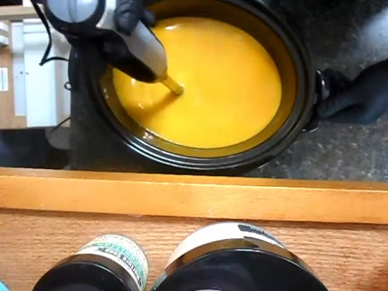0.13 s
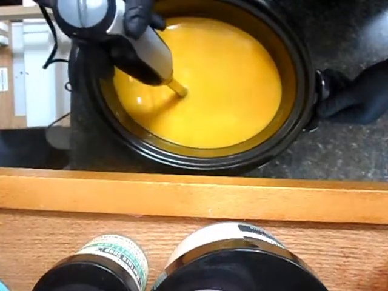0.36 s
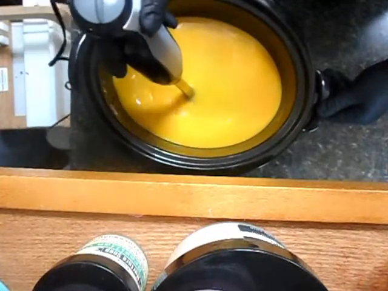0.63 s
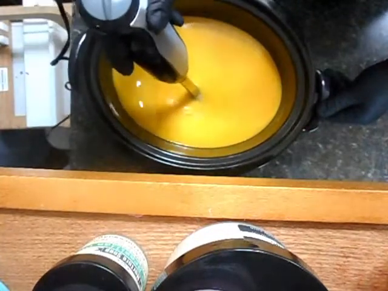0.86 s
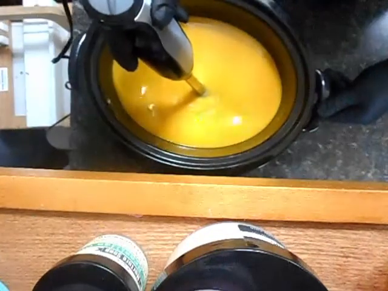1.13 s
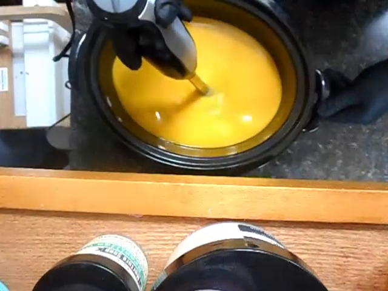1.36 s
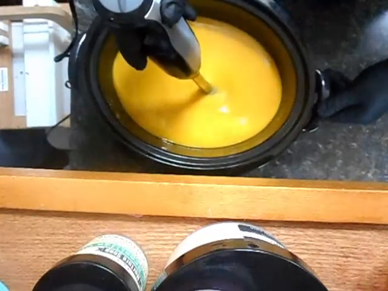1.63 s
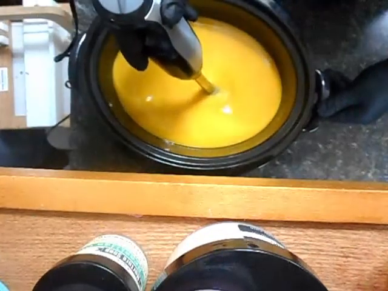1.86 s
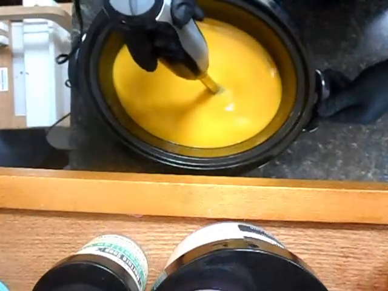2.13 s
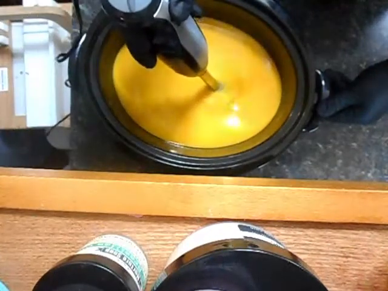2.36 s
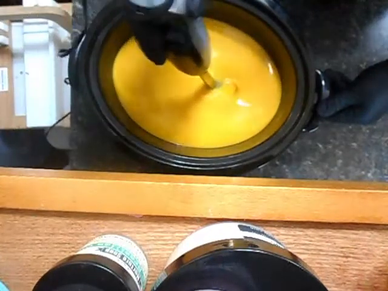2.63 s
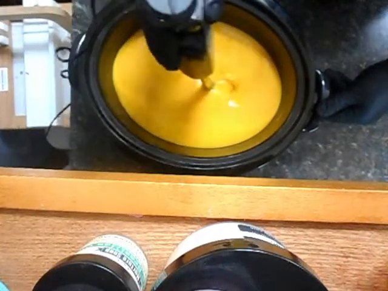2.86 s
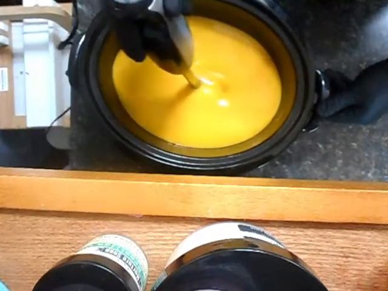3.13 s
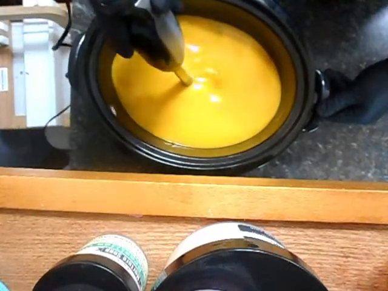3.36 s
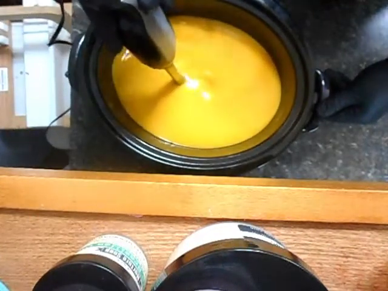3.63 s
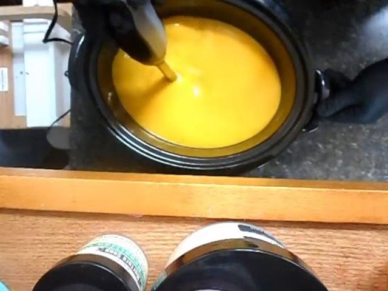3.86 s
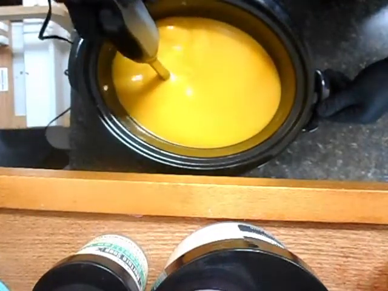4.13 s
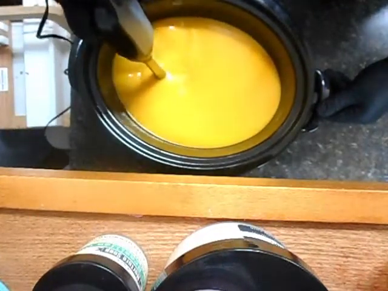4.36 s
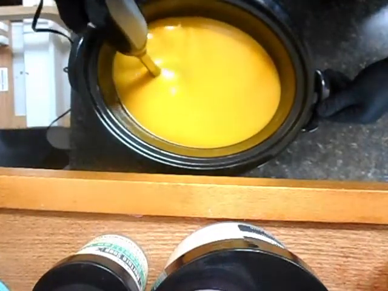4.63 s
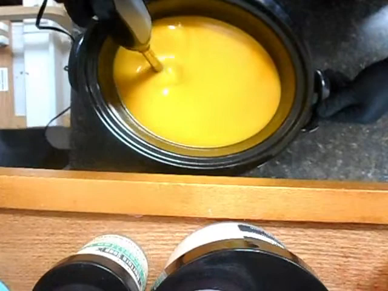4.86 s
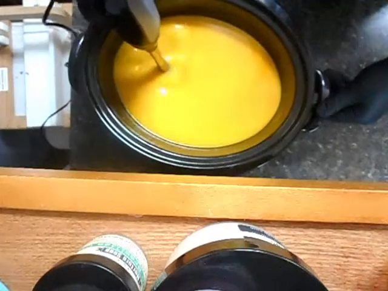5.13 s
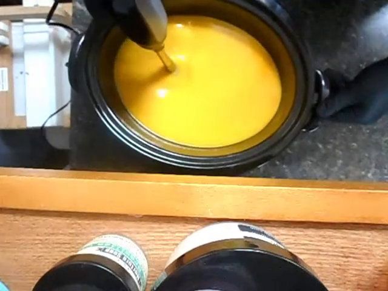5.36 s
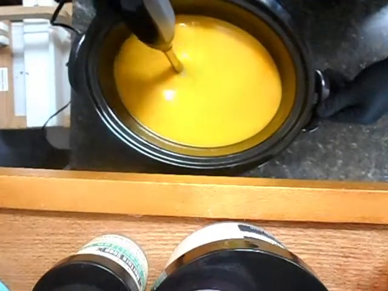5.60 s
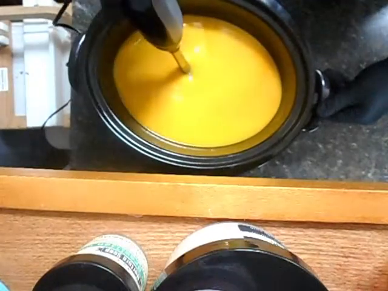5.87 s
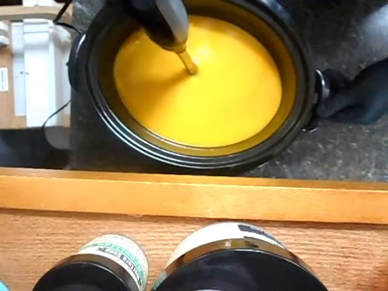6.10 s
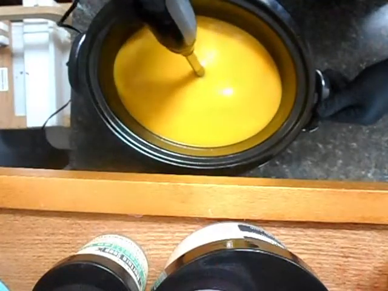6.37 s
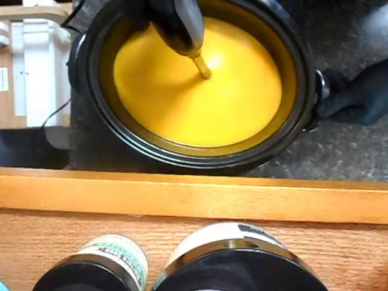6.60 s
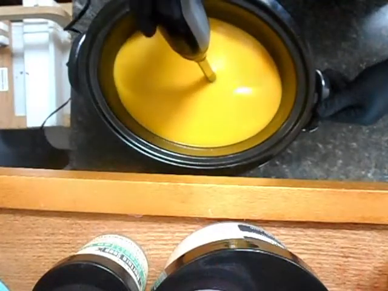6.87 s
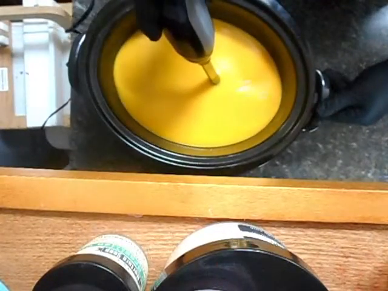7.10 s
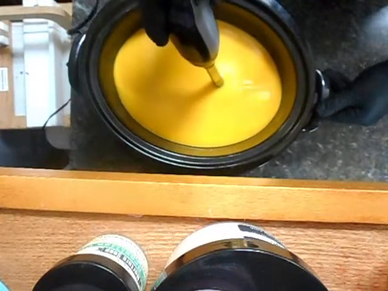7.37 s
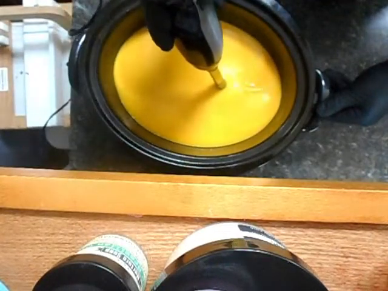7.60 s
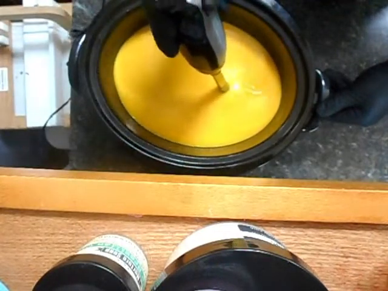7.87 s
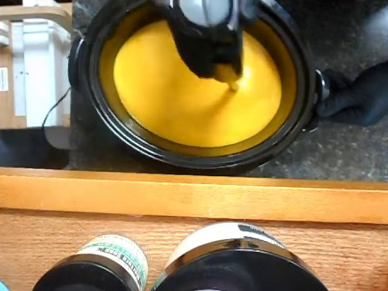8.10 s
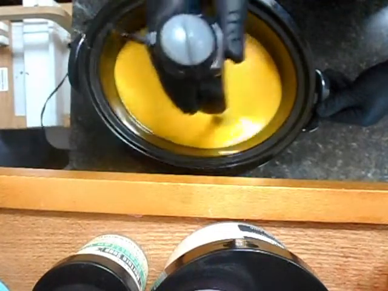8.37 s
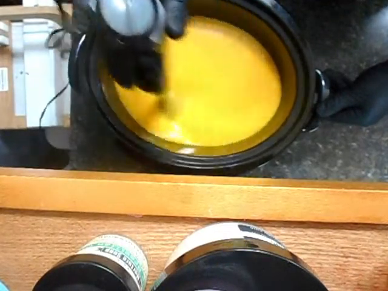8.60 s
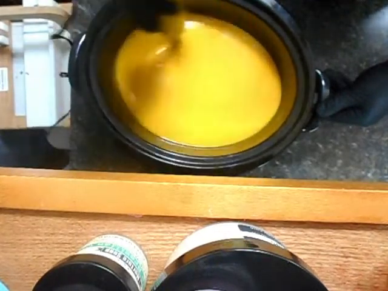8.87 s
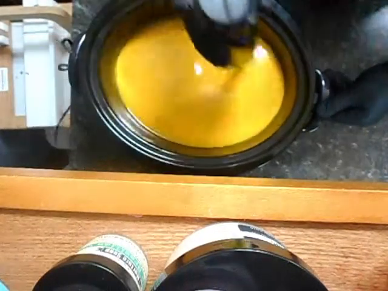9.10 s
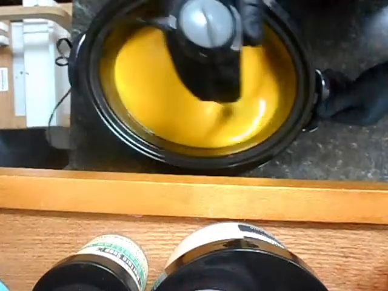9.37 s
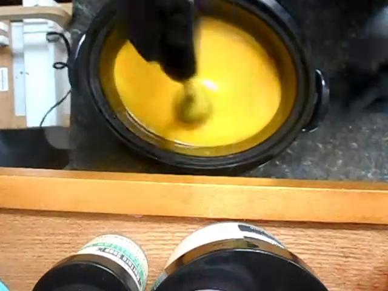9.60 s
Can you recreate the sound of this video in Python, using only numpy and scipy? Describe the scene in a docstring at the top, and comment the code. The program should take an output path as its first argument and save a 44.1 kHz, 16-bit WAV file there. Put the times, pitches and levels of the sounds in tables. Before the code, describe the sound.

A steady, harsh blender whir fills most of the scene, close and single-channel, with slightly gritty, artificial treble. The pitch barely wavers while individual tones come and go. It cuts off near the end with a short low gulp and a falling whine. Several dull ceramic knocks follow, one sharp and strong, then soft dragging through batter and small crackly glove creases, in a lightly reverberant kitchen.

```python
"""In a kitchen, a handheld stick blender whirs in thick batter in a stoneware pot, close below a small camera.
Tones locked to the shaft stand over noises for rasp and churn, which ring the housing.
The motor is let go and coasts down with a gurgle; the foot then knocks and drags on the pot as it stirs,
the shaft tube whines and gloves rustle. Resonances shape the knocks, and the room answers them.
The camera samples at half rate and fills the gaps with straight lines, which mirrors the treble."""
import sys
import numpy as np
from scipy import signal
from scipy.fft import rfft, irfft, next_fast_len
from scipy.io import wavfile
from scipy.ndimage import uniform_filter1d, map_coordinates

SR = 44100
rng = np.random.default_rng(int(sys.argv[2]) if len(sys.argv) > 2 else 0)


def gain_from_decibels(decibels):
    """Convert decibel values to linear amplitude factors."""
    exponent = np.asarray(decibels, float) / 20
    return 10 ** exponent


def transcribe(u):
    """Save the signal u as a 16-bit wav file named by the first command-line argument.

    u: samples, shape (n,) or (channels, n), limited to [-1, 1]; the rate is SR.
    q: integer samples, one column per channel.
    """
    v = np.clip(np.atleast_2d(u).T, -1, 1)
    q = np.round(v * 32767).astype(np.int16)
    wavfile.write(sys.argv[1], SR, q)


N = 429093
TIME_S = np.arange(N) / SR
RELEASE_S, STALL_S = 7.91, 8.17  # the switch opens; the blades stall


def unit(x):
    """Scaled to rms 1."""
    return x / np.sqrt(np.mean(x ** 2) + 1e-20)


def along(points, hz):
    """(frequency [Hz], value) points read on a log frequency axis."""
    f, v = np.transpose(points)
    return np.interp(np.log(hz + 1), np.log(f + 1), v)


def curves(rows):
    """One value per sample for each column after the time."""
    s, *columns = np.transpose(rows)
    return [np.interp(TIME_S, s, column) for column in columns]


def wobble(rate):
    """A smooth random curve, rate knots a second."""
    knots = rng.standard_normal(int(N * rate / SR) + 4)
    return map_coordinates(knots, [np.arange(N) * rate / SR])


def filtered(x, response):
    """x times a response given as a function of frequency."""
    m = next_fast_len(N + SR // 2)
    return irfft(rfft(x, m) * response(np.fft.rfftfreq(m, 1 / SR)), m)[..., :N]


def resonances(modes):
    """Causal response of (frequency [Hz], width [Hz], level [dB]) resonances, with alternating signs."""
    def response(f):
        total = 0
        for k, (centre, width, db) in enumerate(modes):
            ring = 1j * f * width / (centre * centre - f * f + 1j * f * width)
            total = total + (-1) ** k * gain_from_decibels(db) * ring
        return total
    return response


def patchy(patchy_db, slow_db):
    """White noise with random patches of gain: short ones, and long narrow ones
    as the source moves among reflections."""
    z = signal.stft(rng.standard_normal(N), nperseg=512)[2]
    short = uniform_filter1d(uniform_filter1d(rng.standard_normal(z.shape), 6, 0), 8, 1)
    long = uniform_filter1d(uniform_filter1d(rng.standard_normal(z.shape), 2, 0), 120, 1)
    gain = gain_from_decibels(patchy_db * unit(short) + slow_db * unit(long))
    return signal.istft(z * gain, nperseg=512)[1][:N]


def coloured(x, spectrum):
    """x through a (frequency [Hz], level [dB]) spectrum, rms 1."""
    return unit(filtered(x, lambda hz: gain_from_decibels(along(spectrum, hz))))


def fade(start_s, db_per_s):
    """1 until start, then a steady fall; a negative slope instead rises to reach 1 at start."""
    return gain_from_decibels(np.minimum(0, -db_per_s * (TIME_S - start_s)))


# narrow resonances of housing, shaft tube and pot that the noise sets ringing:
# (frequency [Hz], width [Hz], level over the noise [dB])
HOUSING_MODES = [(369, 18, 11.5), (406.4, 18, 13), (599, 13, 6), (1349, 15, 7), (1470, 13.3, 5.5),
                 (1750, 250, 3.5), (2300, 103, 4.5), (4460, 160, 1.5), (6660, 510, -2)]


def blender():
    """Shaft tones, over rasp and churn that share one uneven load and set the housing ringing."""
    turn = shaft_angle()
    lead_db, hum_db, swing_db = tone_levels()
    load = wobble(15)  # blades biting unevenly
    noise = rasp(turn, load) + churn(turn, load, order_6_swing_db=swing_db[2])
    noise = noise * fade(STALL_S, db_per_s=190)
    ringing = filtered(noise, lambda f: np.hypot(1, abs(resonances(HOUSING_MODES)(f))))
    return motor_tones(turn, lead_db, hum_db, swing_db) + ringing


# motor speed under load, before the coast: (time [s], turns per second [Hz])
SHAFT_SPEED = [(0.3, 218.6), (1.6, 217.3), (2.5, 217.6), (2.8, 218.5), (4.6, 218.6), (5.3, 219.2),
               (5.8, 218.8), (6.15, 217.5), (7.6, 216.3), (7.85, 216.7)]


def shaft_angle():
    """Angle of the shaft in radians; its speed sinks once the power is off."""
    hz, = curves(SHAFT_SPEED)
    return 2 * np.pi * np.cumsum(hz * fade(RELEASE_S, db_per_s=22)) / SR


# three leading shaft orders swell and sink as the blender is moved about:
# (time [s], order 3 [dB rms], order 4 [dB rms], order 6 [dB rms])
LEAD_ORDERS = [(0.13, -34, -35, -40), (0.42, -29, -32, -34), (0.77, -24, -34, -39), (1.5, -36, -31, -42),
               (1.96, -29, -38, -35), (2.27, -26, -41, -43), (2.78, -23, -37, -34), (3.19, -21, -32, -37),
               (3.86, -27, -31, -34), (4.2, -31, -30, -31), (4.57, -25, -34, -31), (5.0, -35, -35, -29),
               (5.38, -33, -40, -28), (5.91, -21, -41, -32), (6.51, -21, -36, -34), (7.04, -22, -33, -44),
               (7.23, -25, -33, -44), (7.85, -23, -36, -38)]
# mains hum while the motor runs: (time [s], level [dB rms])
HUM_LEVEL = [(0.3, -79), (1.1, -66), (3.0, -67), (4.6, -85), (5.4, -75), (7.4, -66), (7.85, -71)]


def tone_levels():
    """Levels of the lead orders and the hum, and how far all four swing about their usual levels."""
    lead_db = np.array(curves(LEAD_ORDERS))
    hum_db, = curves(HUM_LEVEL)
    lead_swing_db = lead_db - np.mean(LEAD_ORDERS, axis=0)[1:, None]
    hum_swing_db = hum_db - np.mean(HUM_LEVEL, axis=0)[1]
    return lead_db, hum_db, np.vstack([lead_swing_db, hum_swing_db])


# other orders that follow the lead orders and the hum:
# (multiple of the shaft speed, usual level [dB rms], then gain per dB of orders 3, 4, 6 and the hum [dB/dB])
FOLLOWING_ORDERS = [(1, -51, -.1, -.22, -.15, .14), (2, -41, -.2, -.24, .4, -.1),
                    (5, -43.5, .2, .3, .35, -.42), (7, -33, -.62, -.23, -.35, 0)]
# higher orders: (multiple of the shaft speed, level [dB rms])
UPPER_ORDERS = [(8, -38.5), (9, -45), (10, -42), (11, -46)]
# the mains ripple beats with the shaft:
# (multiple of the shaft speed, ripple steps added, usual level [dB rms])
RIPPLE_BEATS = [(1, -1, -73), (1, 1, -62), (3, -1, -50), (3, 1, -45)]


def motor_tones(turn, lead_db, hum_db, swing_db):
    """Sines at multiples of the shaft speed, their beats with the motor's torque ripple, and mains hum."""
    ripple_hz, beats_follow = 120, 0.4  # the beats follow the hum [dB/dB]
    ripple = 2 * np.pi * ripple_hz * TIME_S
    orders = list(zip((3, 4, 6), lead_db))
    orders += [(k, db + np.dot(per_db, swing_db)) for k, db, *per_db in FOLLOWING_ORDERS]
    orders += UPPER_ORDERS
    tones = np.zeros(N)
    for k, db in orders:
        phase = 0.065 * wobble(30) + rng.uniform(0, 2 * np.pi)
        tones += gain_from_decibels(db + 1.0 * wobble(25)) * np.sin(k * turn + phase)
    for k, step, db in RIPPLE_BEATS:
        beat_db = db + beats_follow * swing_db[-1] + 2.7 * wobble(1.23)
        tones += gain_from_decibels(beat_db) * np.sin(k * turn + step * ripple)
    tones *= fade(RELEASE_S, db_per_s=330)  # they die with the magnetic pull
    hum = gain_from_decibels(hum_db) * np.sin(ripple) * fade(RELEASE_S, db_per_s=200)
    return np.sqrt(2) * (tones + hum)  # sine peaks from rms levels


# rasp of gears, brushes and fan: (frequency [Hz], relative level per Hz [dB])
RASP_SPECTRUM = [(700, -41.5), (1000, -13), (1150, -4), (1300, 0.5), (1800, -1), (2350, -0.5), (2420, 0),
                 (2800, 4), (3100, 1.5), (3700, -2.5), (5000, -9.5), (7000, -11), (8000, -15), (10000, -33)]
# rasp while the motor runs: (time [s], level [dB])
RASP_LEVEL = [(0, -20.5), (0.9, -23), (1.45, -21), (1.9, -21.5), (2.4, -21.5), (2.75, -22.5), (3.3, -23.5),
              (3.6, -21), (3.9, -22), (4.3, -21), (5.1, -21), (5.7, -22), (6.5, -24.4), (7.1, -22),
              (7.5, -21), (7.9, -22)]
# the strongest housing resonance, heard when the vents face the camera:
# (frequency [Hz], width [Hz], level [dB])
VENT_MODE = [(3486, 200, 0)]
# that ring over the rasp: (time [s], level [dB])
VENT_LEVEL = [(0, -4.5), (1.8, -3), (2.45, -7), (2.75, -13), (3.3, -16), (3.8, -7.5), (6.3, -5.5),
              (7.9, -11.5)]


def rasp(turn, load):
    """Noise of gears, brushes and fan that flutters with each turn, plus a ring through the vents."""
    flutter_db = 0.3 * load + 0.78 * wobble(120) + 1.0 * wobble(1500)
    turn_db = 0.36 * np.sin(turn) + 0.3 * np.sin(2 * turn) + 0.25 * np.sin(3 * turn)
    teeth = gain_from_decibels(flutter_db + turn_db)
    (rasp_db,), (vent_db,) = curves(RASP_LEVEL), curves(VENT_LEVEL)
    hiss = coloured(teeth * patchy(0.82, 2.0), RASP_SPECTRUM)
    vents = unit(filtered(teeth * patchy(0.82, 1.8), resonances(VENT_MODE)))
    return gain_from_decibels(rasp_db) * (hiss + gain_from_decibels(vent_db) * vents) * fade(RELEASE_S, db_per_s=46)


# batter churning in the pot: (frequency [Hz], relative level per Hz [dB])
CHURN_SPECTRUM = [(30, -58), (70, -44), (160, -32.5), (300, -28), (400, -21), (550, -9), (700, 4),
                  (800, -1.5), (1000, -6), (1400, -39)]


def churn(turn, load, order_6_swing_db):
    """Low noise of batter, pulsing with each turn; it grows a little with order 6."""
    usual_db, follow, surge_db, surge_s = -29.5, 0.063, 4.5, 0.07  # follow [dB/dB]
    surge = surge_db * np.clip((TIME_S - RELEASE_S) / surge_s, 0, 1)  # just after the release
    pulse = gain_from_decibels(0.95 * load + 0.96 * wobble(40) + 1.1 * np.sin(turn))
    batter = coloured(pulse * patchy(1.34, 1.13), CHURN_SPECTRUM)
    gain = gain_from_decibels(usual_db + follow * order_6_swing_db + surge)
    return gain * batter * fade(RELEASE_S + surge_s, db_per_s=66)


def gurgle():
    """As the blades slow the vortex collapses in uneven low gulps: noise through a steep resonance."""
    gulps = gain_from_decibels(2.5 * wobble(28)) * rng.standard_normal(N)
    low = unit(filtered(gulps, lambda f: resonances([(560, 330, 0)])(f) ** 3))
    return gain_from_decibels(-30) * low * fade(7.93, db_per_s=-450) * fade(8.06, db_per_s=167)


# blows of the foot on the pot: (time [s], blow level [dB], thud level over the blow [dB],
# t60 [s], the spot struck favours modes near [Hz])
POT_KNOCKS = [(8.1192, -18, -19, 0.024, 3400), (8.2462, -30, -28.5, 0.02, 3200),
              (8.3, -34, -30, 0.02, 4200), (8.3994, -35, -30, 0.025, 3180), (8.4607, -39, -30, 0.02, 3200),
              (8.5715, -38, -30, 0.02, 3400), (8.5869, -33, -29, 0.03, 2040),
              (8.782, -34, -30, 0.043, 2300), (8.8443, -12, -17, 0.047, 2400),
              (8.963, -30, -27, 0.03, 3300), (8.971, -29.5, -34, 0.024, 3530), (9.343, -47, 8, 0.03, 1930),
              (9.3894, -47, -16, 0.03, 3800)]
# pot wall: (frequency [Hz], width [Hz], level [dB])
POT_WALL = [(990, 1240, 0.5), (3800, 2300, 3), (8540, 5200, -15)]
# short ring of pot and foot: (frequency [Hz], level before the spot's weighting [dB])
CLINK_MODES = [(535, 0), (940, -1), (1340, -7), (2100, -8), (2550, -11), (3180, -8), (3500, -5),
               (4300, -13), (4880, -8), (6100, -13)]
# worktop under the pot: (frequency [Hz], level [dB], t60 [s], rise [s])
WORKTOP_MODES = [(248, -1.5, 0.051, .002), (92.5, -14, 0.27, .04)]


def knocks():
    """Each blow: a burst into the pot wall, a short ring set by the spot struck, a thud through the worktop.
    The room answers the burst and the thud."""
    crack, ring, thud = np.zeros((3, N + SR))
    t = np.arange(SR // 4) / SR
    spot_db_per_octave = 11
    for s, db, thud_db, t60, spot_hz in POT_KNOCKS:
        blow = gain_from_decibels(db - 60 * t / t60) * (1 - np.exp(-t / 0.00023))
        here = slice(round(s * SR), round(s * SR) + len(t))
        crack[here] += gain_from_decibels(-2.5) * blow * rng.standard_normal(len(t))
        for f, mode_db in CLINK_MODES:
            gain = gain_from_decibels(mode_db - spot_db_per_octave * abs(np.log2(f / spot_hz)))
            ring[here] += blow * gain * np.sin(2 * np.pi * f * t)
        for f, mode_db, life, rise in WORKTOP_MODES:
            decay = gain_from_decibels(db + thud_db + mode_db - 60 * t / life)
            thud[here] += decay * np.sin(2 * np.pi * f * t) * (1 - np.exp(-t / rise))
    body = filtered(crack[:N], resonances(POT_WALL)) + thud[:N]
    return body + ring[:N] + gain_from_decibels(-5.5) * kitchen(body)


# one spectrum for each whine of the shaft tube, low then high with faint partners; stirring() squares the
# response, which doubles the dB and narrows the peaks: (frequency [Hz], width [Hz], level [dB])
WHINE_MODES = [
    [(1575, 130, 1)],
    [(2520, 170, 0.1), (2950, 120, -6), (3145, 50, -3.5), (4230, 250, -9), (4870, 200, -9)],
]
# foot dragging through batter, with room hiss: (frequency [Hz], relative level per Hz [dB])
DRAG_SPECTRUM = [(40, -25), (90, -15), (250, -10), (500, 0), (900, -3), (2000, 0.5), (3500, -5.5),
                 (5000, -12.5), (7000, -21), (10000, -32)]
# glove rustle: (frequency [Hz], relative level per Hz [dB])
RUSTLE_SPECTRUM = [(1000, -30), (3000, -18), (5000, 2), (8200, -2), (10000, -12)]


def stirring():
    """The shaft tube whines as it slows and rubs; the foot drags through batter; the gloves rustle."""
    *whine_gains, drag_gain, rustle_gain = effort()
    slips = gain_from_decibels(0.67 * wobble(45) + 0.84 * wobble(300))
    whine = np.zeros(N)
    for gain, modes in zip(whine_gains, WHINE_MODES):
        rubbing = slips * rng.standard_normal(N)
        whine += gain * unit(filtered(rubbing, lambda f: resonances(modes)(f) ** 2))
    whine *= fade(8.23, db_per_s=-500)  # sets in just after the stall
    drag = coloured(slips * patchy(1.0, 1.0), DRAG_SPECTRUM)
    rustle = coloured(gain_from_decibels(1.6 * wobble(30) + 1.4 * wobble(500)) * patchy(2.5, 1.5), RUSTLE_SPECTRUM)
    mix = whine + drag_gain * drag + rustle_gain * rustle
    return mix * fade(STALL_S, db_per_s=-150)


# the last turns die away, rows low whine, high whine, drag, rustle: (level at the stall [dB], fall [dB/s])
COAST_FALL = [(-46, 24), (-35.5, 41), (-42, 24), (-51, 72)]
# what stays of the same four while the blender idles in the batter: level [dB]
REST_LEVEL = [-67, -84, -57.5, -63]
# stirring strokes: (time [s], hold [s], low whine level [dB], drag level [dB], rustle level [dB])
STIR_STROKES = [(8.836, 0.095, -55, -40, -60), (9.0, 0.12, -60, -63, -68), (9.38, .2, -63, -55, -57.5),
                (9.63, .12, -57, -53, -69)]


def effort():
    """Gain of low whine, high whine, drag and rustle: rest, the dying coast and each stroke, added as powers."""
    attack_s, release_db_per_s, high_whine_db = 0.017, 170, -3  # high whine over the low one
    power = np.array([gain_from_decibels(rest_db) ** 2 + (gain_from_decibels(db) * fade(STALL_S, fall)) ** 2
                      for rest_db, (db, fall) in zip(REST_LEVEL, COAST_FALL)])
    for s, hold, whine_db, drag_db, rustle_db in STIR_STROKES:
        shape = np.clip((TIME_S - s) / attack_s, 0, 1) * fade(s + hold, release_db_per_s)
        peak = gain_from_decibels([[whine_db], [whine_db + high_whine_db], [drag_db], [rustle_db]])
        power += (peak * shape) ** 2
    return np.sqrt(power)


# a glove creases: (time [s], level before a 2.5 dB cut and the burst's envelope [dB], centre [Hz])
GLOVE_CREASES = [(9.3841, -45, 7150), (9.4759, -42, 8000), (9.4948, -41, 7940), (9.5188, -40, 8230),
                 (9.5344, -47, 8490), (9.5502, -40, 5880), (9.5841, -46, 6900)]


def gloves():
    """Each crease is a short burst of treble hiss, strongest around its own pitch."""
    out, t = np.zeros(N + SR), np.arange(SR // 20) / SR
    for s, db, hz in GLOVE_CREASES:
        smooth_noise = uniform_filter1d(rng.standard_normal(len(t)), size=24)
        grain = unit(smooth_noise * np.sin(2 * np.pi * hz * t))
        envelope = gain_from_decibels(db - 2.5 - 60 * t / 0.035) * (1 - np.exp(-t / 0.001))
        out[round(s * SR):][:len(t)] += envelope * grain
    return out[:N]


# decay of the room: (frequency [Hz], t60 [s])
KITCHEN_DECAY = [(200, 0.43), (2000, 0.22), (9000, 0.3)]


def kitchen(x):
    """The room's answer: a noise tail, 250 samples late, in which each frequency dies at its own speed."""
    hz, t, z = signal.stft(rng.standard_normal(SR // 2), SR, nperseg=256)
    decay = gain_from_decibels(-60 * t / along(KITCHEN_DECAY, hz)[:, None])
    tail = signal.istft(z * decay, SR, nperseg=256)[1]
    return signal.fftconvolve(np.pad(x, (250, 0)), tail / np.linalg.norm(tail))[:N]


def scene():
    """Blender, gurgle, knocks, stirring and gloves, as one channel."""
    return (blender() + gurgle() + knocks() + stirring() + gloves())[None]


def top_cut(x):
    """Nothing passes above the cut-off."""
    return signal.sosfilt(signal.butter(12, 16540, fs=SR, output="sos"), x)


def record(dry):
    """Steep filter and low cut, every second sample kept, the others set halfway between, band limit."""
    def steep_edges(hz):
        return np.exp(-(hz / 10450) ** 40) / (1 + (30 / (hz + 1)) ** 2)
    smooth = filtered(dry[0], steep_edges)
    n = np.arange(N)
    doubled = np.interp(n, n[1::2], smooth[1::2])  # straight lines mirror the treble about SR / 4
    top_hz = 15730
    mix = filtered(doubled, lambda hz: hz < top_hz)[None]
    return top_cut(mix)


dry = scene()
out = record(dry)
transcribe(out)
```